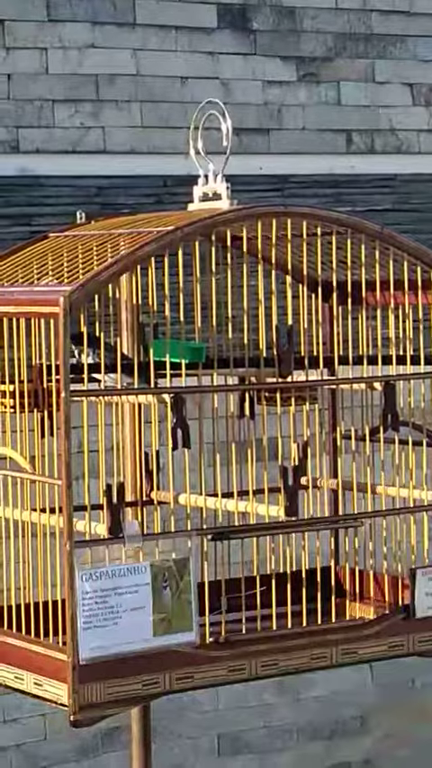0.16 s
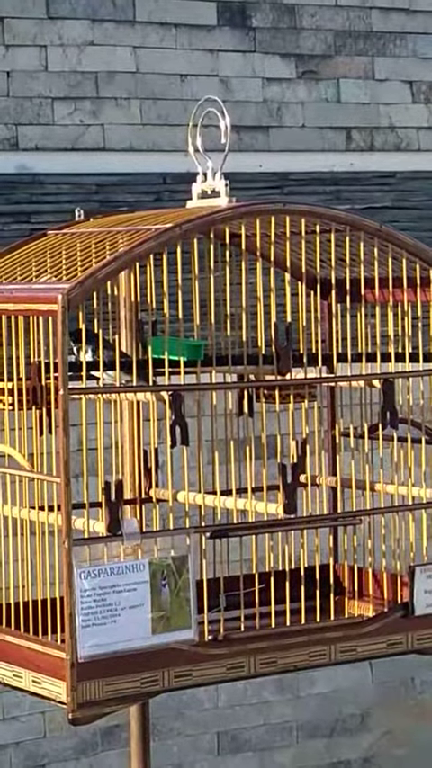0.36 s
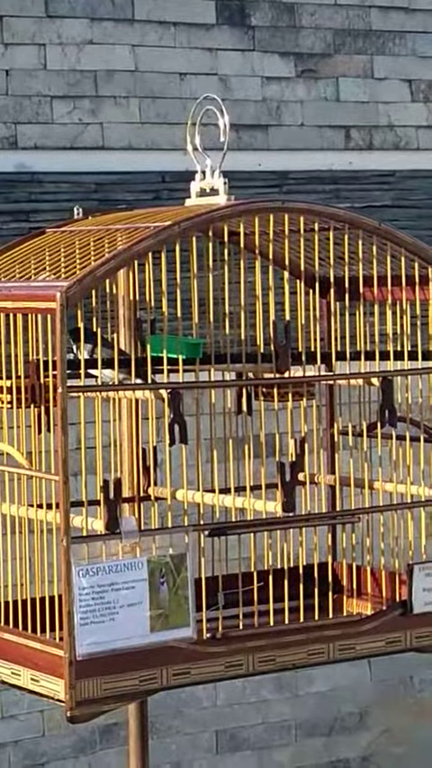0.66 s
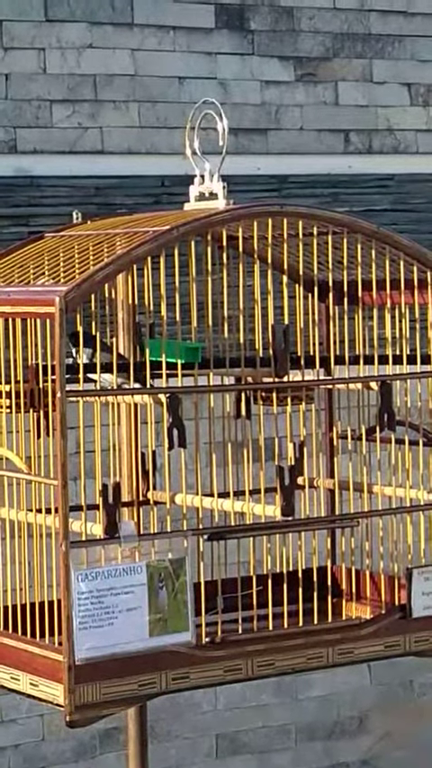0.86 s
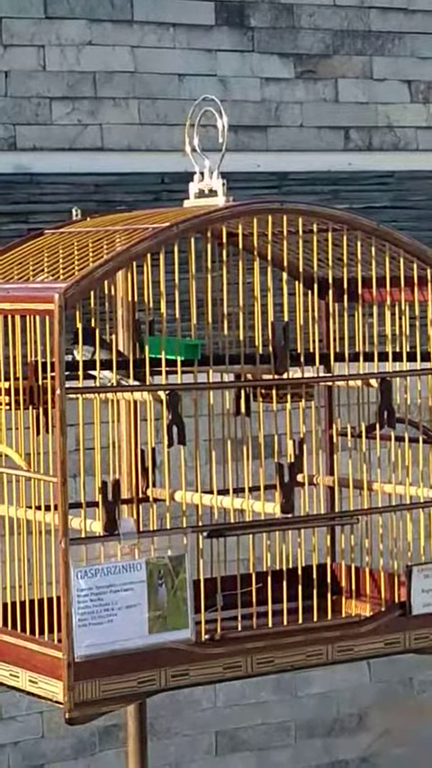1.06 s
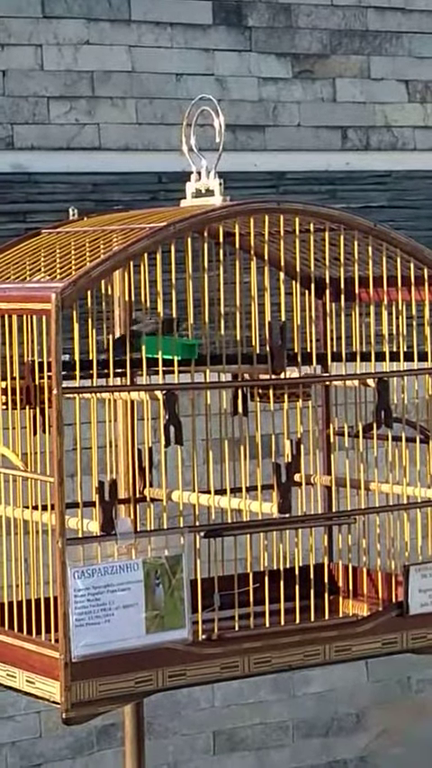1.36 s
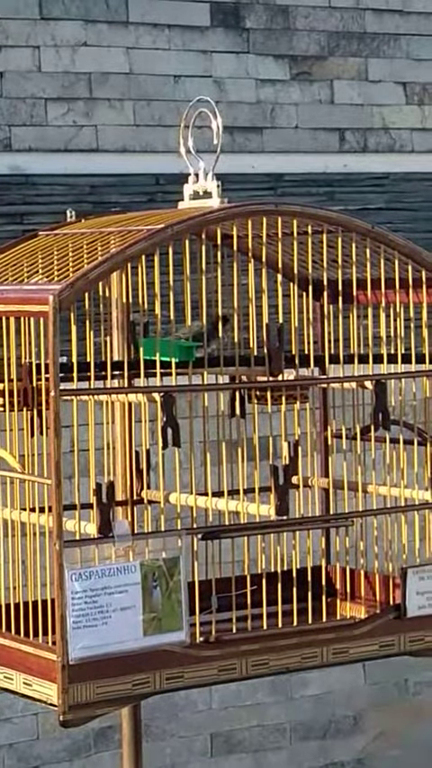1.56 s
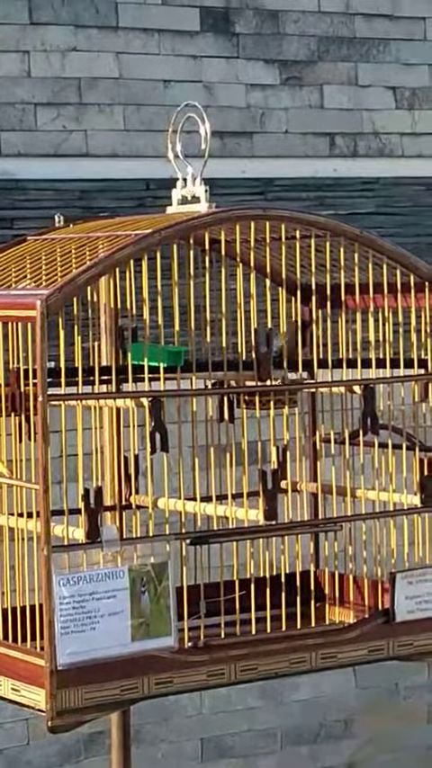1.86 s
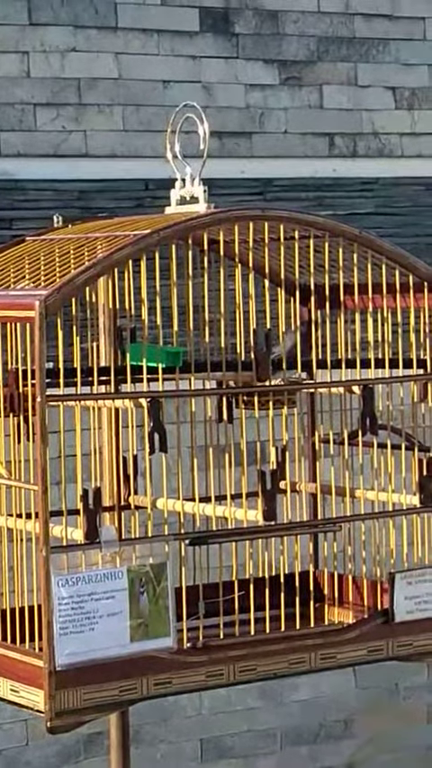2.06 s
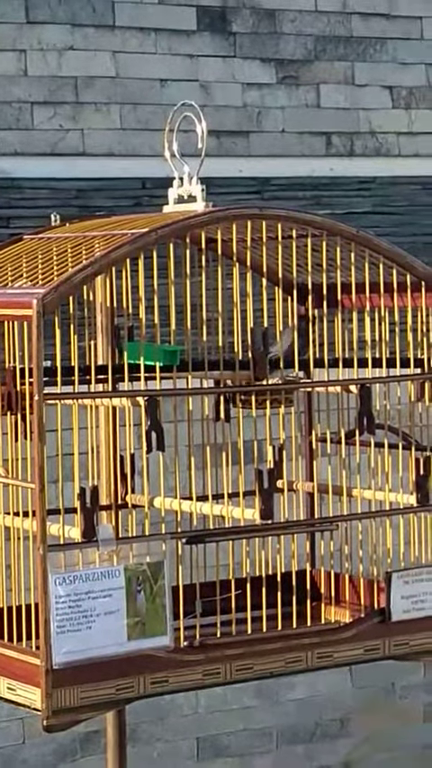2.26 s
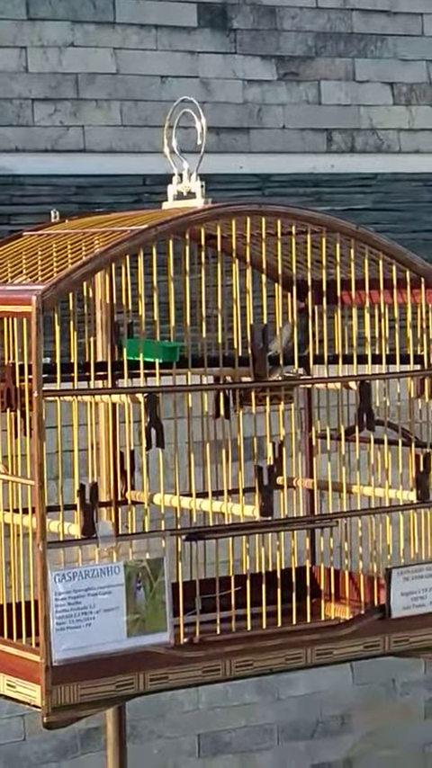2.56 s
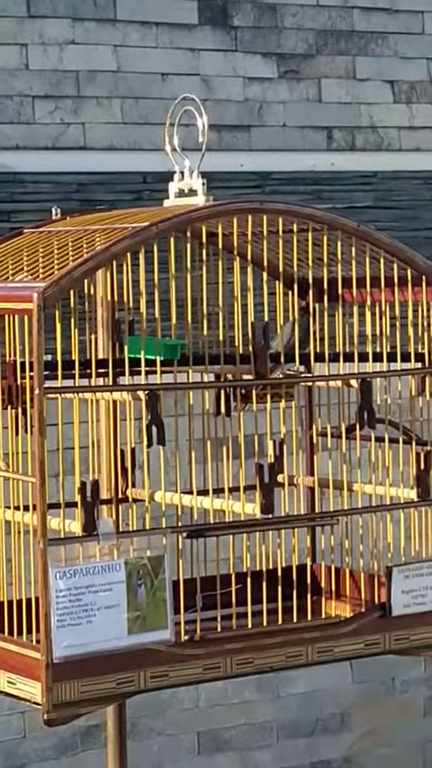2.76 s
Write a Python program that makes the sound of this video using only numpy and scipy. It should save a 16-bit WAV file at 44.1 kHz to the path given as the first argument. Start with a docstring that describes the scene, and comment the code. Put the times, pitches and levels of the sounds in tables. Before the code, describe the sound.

High gliding whistles from a small songbird in a cage, over faint dull knocks outdoors.

```python
"""Caged seedeater by a stone wall

The bird sings slurred, near-pure whistles, three loud upsweeps and a closing buzz of chirps
from the two sides of its syrinx. Cage and wall throw each note back; the yard rings on after it.
Dull knocks, perhaps footsteps, sound farther off over a low outdoor hum."""
import sys
import numpy as np
from scipy import signal
from scipy.fft import rfft, irfft, next_fast_len
from scipy.io import wavfile
from scipy.ndimage import uniform_filter1d

SR = 44100
rng = np.random.default_rng(int(sys.argv[2]) if len(sys.argv) > 2 else 0)


def output_pcm(signal):
    """Save a mono or channel-first signal as 16-bit PCM at the path in sys.argv[1].

    Samples are clipped to [-1, 1] before scaling.
    """
    pcm = np.clip(np.atleast_2d(signal).T, -1, 1) * 32767
    wavfile.write(sys.argv[1], SR, np.round(pcm).astype(np.int16))


N = 127890
LEAD = SR // 4  # samples ahead of time zero
SPAN = N + LEAD


def bird():
    """Whistles and buzz, each with its own echo strength, sounding in the yard."""
    # Each row: path of (time in s, pitch in Hz, level in dB), third harmonic in dB, echo send in dB.
    whistles = [ ([(-.15, 5335, -42.5), (-.02, 3755, -38)], -21.5, 5), ([(0.085, 3600, -44.5),
                (0.122, 2400, -53.5), (0.15, 3150, -41.5), (0.203, 4253, -31), (0.235, 4270, -57)],
                -21, 3.5), ([(0.314, 5540, -42), (0.333, 5130, -33), (0.36, 5790, -51), (0.378, 5795, -31),
                (0.392, 5240, -39), (0.412, 4850, -42.5)], -14, 2.2), ([(0.488, 4335, -45.5),
                (0.513, 3008, -43.5), (0.544, 4190, -40), (0.592, 3142, -43.5)], -19.5, 5.2),
                ([(0.676, 5350, -34), (0.69, 5265, -47), (0.708, 4260, -36.5), (0.724, 4130, -29.5),
                (0.75, 4500, -42.5), (0.775, 4096, -37.5)], -21, 0.23), ([(0.89, 3765, -50.5),
                (0.926, 2480, -50.5), (0.955, 3250, -47.5), (0.99, 2926, -50.5)], -22, 4.3),
                ([(1.03, 3600, -45), (1.08, 3320, -41)], -27, 1.3), ([(1.215, 3900, -59),
                (1.245, 3780, -37.5), (1.268, 3430, -39.5), (1.285, 3016, -36), (1.305, 2960, -73)],
                -21.5, -1.4), ([(1.312, 3616, -35), (1.358, 3610, -57.5), (1.388, 3536, -30.5),
                (1.425, 3280, -41)], -31.5, 0.74), ([(1.495, 5950, -42.5), (1.54, 6250, -39),
                (1.583, 5820, -27), (1.603, 5010, -28.5), (1.62, 4450, -41)], -17.5, 1),
                ([(1.65, 4097, -32.5), (1.705, 4230, -33.5), (1.745, 3960, -29), (1.8, 3900, -38.5)],
                -34, -3.5), ([(1.863, 7835, -52), (1.875, 6510, -38.5), (1.89, 5740, -26.5),
                (1.912, 4700, -34.5), (1.965, 3320, -31.5)], -27, 0.31), ([(1.865, 2350, -66),
                (1.91, 2747, -35.5), (1.955, 3260, -32.5), (1.988, 3472, -21.5), (2.005, 3520, -21.5),
                (2.02, 3185, -41)], -33.5, -5), ([(2.034, 8000, -63), (2.053, 7300, -32),
                (2.07, 6950, -44.5), (2.1, 6650, -39.5)], -7.5, 1.6), ([(2.145, 2550, -43.5),
                (2.185, 2956, -28), (2.22, 3130, -30), (2.269, 4050, -15.5), (2.292, 4260, -19.5),
                (2.318, 4030, -30)], -30, -5.5), ([(2.26, 5100, -38), (2.298, 7250, -44)], -13, 3.1),
                ([(2.368, 2805, -56), (2.385, 2710, -30.5), (2.42, 3026, -26.5), (2.452, 3440, -26.5),
                (2.488, 3924, -17.5), (2.518, 4130, -19), (2.535, 3670, -77)], -30.5, -3.5)]
    direct = buzz()
    echo_send = amp(-5.5) * direct
    waver, flutter = drift(rate_hz=200), drift(rate_hz=200)
    for path, third_db, echo_db in whistles:
        offset = rng.integers(N // 2)
        start_s, note = whistle(path, third_db, waver[offset:], flutter[offset:])
        add(direct, start_s, note)
        add(echo_send, start_s, amp(echo_db) * note)
    return song_at_mics(direct, echo_send)


def whistle(path, third_db, waver, flutter):
    """A gliding tone with three weak overtones. Returns start in s and sound."""
    attack_s, release_s, glide_s = 0.0082, 0.01, 0.013
    waver_depth, flutter_db = 0.0025, 1.3
    path_s, path_hz, path_db = np.transpose(path)
    t = np.arange(path_s[0] - attack_s, path_s[-1] + release_s, 1 / SR)
    hz = uniform_filter1d(np.interp(t, path_s, path_hz), int(glide_s * SR))
    hz *= 1 + waver_depth * waver[:len(t)]
    phase = 2 * np.pi * np.cumsum(hz) / SR
    harmonics_db = [0, third_db - 6, third_db, third_db - 5]
    tone = sum(amp(db) * np.sin(k * phase) * (k * hz < SR / 2) for k, db in enumerate(harmonics_db, 1))
    gate = np.clip((t - t[0]) / attack_s, 0, 1) * np.clip((t[-1] - t) / release_s, 0, 1)
    level_db = np.interp(t, path_s, path_db) + flutter_db * flutter[:len(t)]
    return t[0], np.sqrt(2) * tone * np.sin(np.pi / 2 * gate) ** 2 * amp(level_db)


def buzz():
    """The two sides of the syrinx alternate uneven downward chirps, wrapped in rasp."""
    # Each entry: pulse centre in s.
    pulses_s = [2.586, 2.595, 2.607, 2.619, 2.631, 2.636, 2.648, 2.664, 2.675, 2.688, 2.697, 2.710, 2.72,
                2.733, 2.748, 2.759, 2.769, 2.779]
    # Each row: frequency in Hz, relative noise density in dB.
    rasp_spectrum = [(2200, -8.5), (3500, 3), (6200, 7.5), (7800, 1.5), (12000, -8), (14000, 2)]
    # Rasp before the loud phrase and in mid-buzz. Each row: centre in s, level in dB, width in s.
    puffs = [(1.848, -36, .009), (2.679, -33.5, 0.0057)]
    high_hz, low_hz, detune, fall_hz_per_s = 5170, 3995, 0.063, 200000
    low_db, low_lag_s, rasp_db = -15.5, 0.016, -14.5
    rise_s, fade_s = 0.022, 0.05
    chirps, rasp_envelope = np.zeros(SPAN), np.zeros(SPAN)
    t = np.arange(-SR // 80, SR // 80) / SR
    jitter = rng.uniform(-0.96, 1, (len(pulses_s), 4))
    for s, (high, low, steepness, push) in zip(pulses_s, jitter):
        taper = max(1 - (s - pulses_s[0]) / rise_s, 1 - (pulses_s[-1] - s) / fade_s, 0)
        level_db = -16 - 10 * taper + 2 * push
        envelope = np.sqrt(2) * amp(level_db) * gaussian(t, width_s=0.0019)
        fall_per_s = fall_hz_per_s * (1 + steepness / 2) / high_hz
        phase_per_hz = 2 * np.pi * (t - fall_per_s * t ** 2 / 2)
        high_chirp = envelope * np.sin(high_hz * (1 + detune * high) * phase_per_hz)
        low_chirp = envelope * np.sin(low_hz * (1 + detune * low) * phase_per_hz)
        add(chirps, s + t[0], high_chirp)
        add(chirps, s + t[0] + low_lag_s, amp(low_db) * low_chirp)
        add(rasp_envelope, s + t[0], amp(level_db + rasp_db) * gaussian(t, width_s=0.0034))
    scene_s = (np.arange(SPAN) - LEAD) / SR
    for s, level_db, width_s in puffs:
        rasp_envelope += amp(level_db) * gaussian(scene_s - s, width_s)
    return chirps + rasp_envelope * noise(rasp_spectrum)


def song_at_mics(direct, echo_send):
    """The song reaches the left microphone first; its top treble is beamed away and arrives scattered."""
    # Each row: frequency in Hz, left minus right in dB.
    balance = [(4000, 1.26), (14000, -8)]
    right_lag_s, beam_hz, beam_db = 0.0003141, 10100, 4
    beam = lambda hz: amp(beam_db * (1 + np.tanh((hz - beam_hz) / 1000)) / 2)
    pair = np.array([direct, shape(direct, lambda hz: delay(hz, right_lag_s))])
    song = shape(pair + early_echoes(echo_send), lambda hz: 1 / beam(hz)) + far_echo(direct)
    diffuse = amp(-7) * scatter(echo_send) + amp(-9.5) * yard(echo_send)
    song += shape(diffuse, beam)
    return shape(song, lambda hz: amp(np.array([[1], [-1]]) * read(balance, hz) / 2))


def early_echoes(x):
    """Distinct reflections off the cage, wall and ground."""
    # Each row: delay in s, left gain, right gain.
    taps = [(.0023, 0.64, -0.52), (0.019, 0.5, 0.62)]
    return shape(x, lambda hz: sum(np.array([[left], [right]]) * delay(hz, s) for s, left, right in taps))


def scatter(x, peak_s=0.011):
    """A short cloud of reflections off nearby things, different on each side."""
    t = np.arange(SR // 4) / SR
    cloud = rng.standard_normal((2, len(t))) * t * np.exp(-t / peak_s)
    return reverberate(x, cloud)


def yard(x, build_s=0.063):
    """A diffuse stereo tail, each band decaying at its own rate."""
    # Each row: frequency in Hz, T60 in s.
    decay_times = [(500, 0.52), (4000, 0.83), (13000, 0.47)]
    hz, t, bands = signal.stft(rng.standard_normal((2, SR)), SR, nperseg=256)
    decay = amp(-60 * t / read(decay_times, hz)[:, None])
    tail = signal.istft(bands * decay, SR, nperseg=256)[1]
    tail *= np.minimum(np.arange(tail.shape[1]) / SR / build_s, 1)
    return reverberate(x, tail)


def far_echo(x, delay_s=0.38):
    """A distant wall returns the song late, faint and blurred."""
    return amp(-22.5) * shape(scatter(x), lambda hz: delay(hz, delay_s))


def knocks():
    """Dull, hollow thuds and their scuffs, blurred by reflections."""
    # Each row: start in s, level in dB.
    hits = [(.0865, -16), (.0945, -23), (.148, -25.5), (.332, -27.5), (.535, -28.5), (.614, -25),
            (.9185, -24), (.933, -21.5), (1.184, -24.5), (1.435, -23.5), (1.470, -23.5), (1.712, -17),
            (1.735, -27.5), (1.961, -29.5), (2.123, -37.5), (2.247, -27.5), (2.500, -25.5), (2.519, -20.5),
            (2.756, -29)]
    # Each row: frequency in Hz, relative level in dB, T60 in s.
    modes = [(355, -7.5, 0.015), (873, 0.5, 0.022), (1009, -6, 0.023)]
    rise_s, detune, wide_below_hz = 0.0014, 0.076, 380
    t = np.arange(SR // 4) / SR
    rise = 1 - np.exp(-t / rise_s)
    thuds = np.zeros(SPAN)
    for start_s, level_db in hits:
        for hz, mode_db, t60_s in modes:
            tuned_hz = hz * (1 + detune * rng.uniform(-1, 1))
            envelope = rise * amp(level_db + mode_db - 60 * t / t60_s)
            add(thuds, start_s, envelope * np.sin(2 * np.pi * tuned_hz * t))
    direct = thuds + scuffs()
    mid, side = amp(-6.5) * (yard(direct) + scatter(direct))
    side = shape(side, lambda hz: 2 / (1 + (hz / wide_below_hz) ** 2))
    return direct + np.array([mid + side, mid - side])


def scuffs():
    """Gritty noise bursts that end the heavy knocks."""
    # Each row: start in s, level in dB.
    bursts = [(0.089, -33.5), (.93, -36.5), (1.729, -33), (2.513, -39.5)]
    # Each row: frequency in Hz, relative noise density in dB.
    scuff_spectrum = [(100, -18), (280, 5.5), (850, 3.5), (1600, -7.5), (6000, -28)]
    rise_s, t60_s, grain_db = 0.0091, 0.19, 5.5
    t = np.arange(SR // 4) / SR
    envelope = np.zeros(SPAN)
    for start_s, level_db in bursts:
        add(envelope, start_s, np.minimum(t / rise_s, 1) * amp(level_db - 60 * t / t60_s))
    return envelope * noise(scuff_spectrum) * amp(grain_db * drift(rate_hz=88))


def air():
    """Steady low outdoor noise, partly common to both sides, a little louder on the left."""
    # Each row: frequency in Hz, relative noise density in dB.
    air_spectrum = [(25, -30), (70, 6), (160, 10.5), (950, -5), (1800, -11), (7000, -21)]
    # Each row: frequency in Hz, left-right correlation from 0 to 1.
    correlation = [(900, 0.68), (6000, 0.033)]
    pair = np.array([noise(air_spectrum), noise(air_spectrum)])
    separate = shape(pair, lambda hz: np.sqrt(1 - read(correlation, hz)))
    common = shape(noise(air_spectrum), lambda hz: np.sqrt(read(correlation, hz)))
    return amp(-51.5) * (common + separate) * amp([[1], [-1]])


def amp(db):
    """Decibels to gain."""
    return 10 ** (np.asarray(db) / 20)


def unit(x):
    """Scales to rms 1."""
    return x / np.sqrt(np.mean(x ** 2) + 1e-20)


def gaussian(t, width_s):
    """Bell curve, peak 1 at t = 0."""
    return np.exp(-(t / width_s) ** 2 / 2)


def delay(hz, lag_s):
    """Frequency response of a pure delay."""
    return np.exp(-2j * np.pi * hz * lag_s)


def read(points, hz):
    """Interpolates (Hz, value) rows on a log-frequency axis."""
    points_hz, values = np.transpose(points)
    return np.interp(np.log(hz + 1), np.log(points_hz + 1), values)


def shape(x, gain):
    """Filters by gain(hz)."""
    size = next_fast_len(x.shape[-1] + 4096)
    hz = np.fft.rfftfreq(size, 1 / SR)
    return irfft(rfft(x, size) * gain(hz), size)[..., :x.shape[-1]]


def reverberate(x, response):
    """Convolves with a stereo response scaled to unit energy on the left."""
    return signal.fftconvolve(x[None], response / np.linalg.norm(response[0]), axes=1)[:, :SPAN]


def noise(spectrum):
    """Noise of rms 1 with the given spectrum."""
    return unit(shape(rng.standard_normal(SPAN), lambda hz: amp(read(spectrum, hz))))


def drift(rate_hz):
    """Smooth random wander of rms 1."""
    return unit(shape(rng.standard_normal(SPAN), lambda hz: np.exp(-(hz / rate_hz) ** 2)))


def add(mix, start_s, sound):
    """Mixes a sound in at start_s."""
    part = mix[max(round(start_s * SR) + LEAD, 0):][:len(sound)]
    part += sound[:len(part)]


def scene():
    """Bird, knocks and outdoor hum in stereo."""
    return (bird() + knocks() + air())[:, LEAD:]


def record(dry):
    """Microphone colour, then a steep low-pass."""
    # Each row: frequency in Hz, gain in dB.
    mic_response = [(1750, 2.5), (2200, -12), (2600, 3), (8400, 5), (9400, -7), (10300, 8)]
    cutoff_hz = 14350
    coloured = shape(dry, lambda hz: amp(read(mic_response, hz)))
    lowpass = signal.firwin(511, cutoff_hz, window=("kaiser", 9), fs=SR)
    return signal.oaconvolve(coloured, lowpass[None], "same")


dry = scene()
out = record(dry)
output_pcm(out)
```